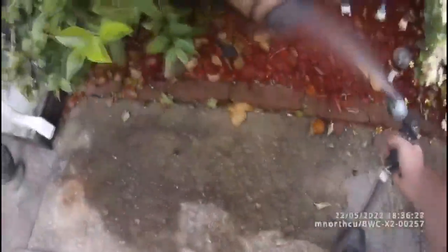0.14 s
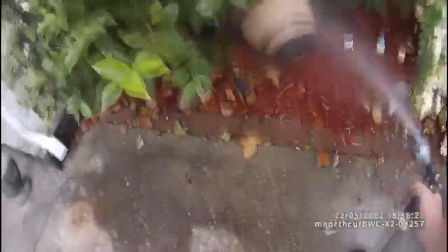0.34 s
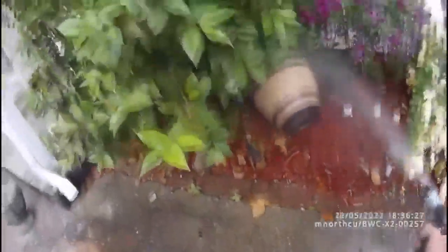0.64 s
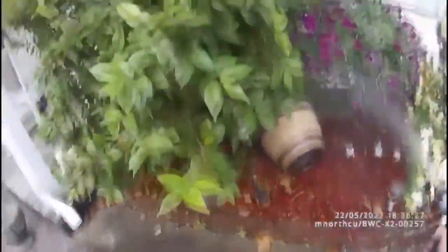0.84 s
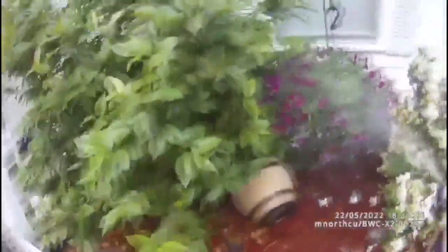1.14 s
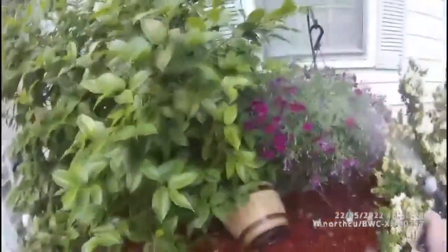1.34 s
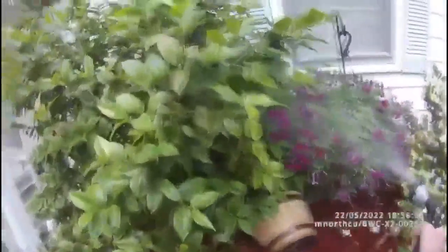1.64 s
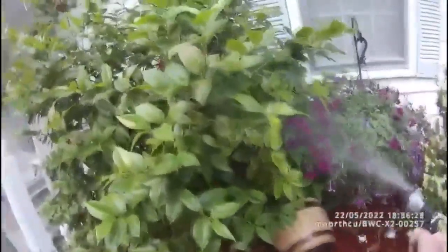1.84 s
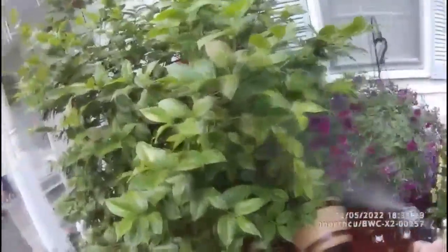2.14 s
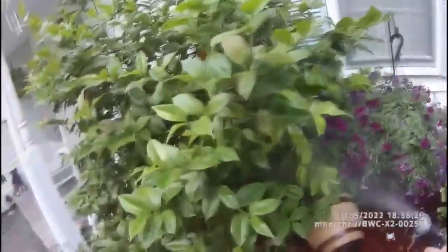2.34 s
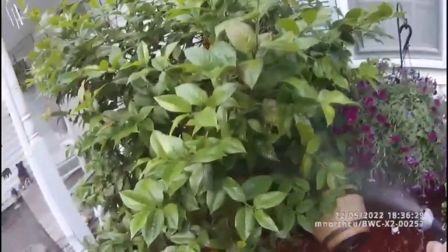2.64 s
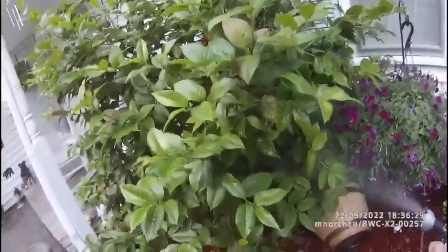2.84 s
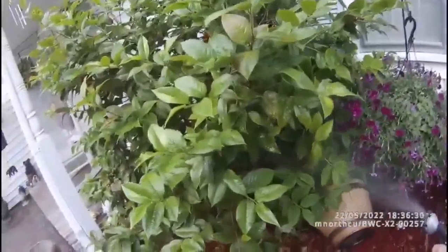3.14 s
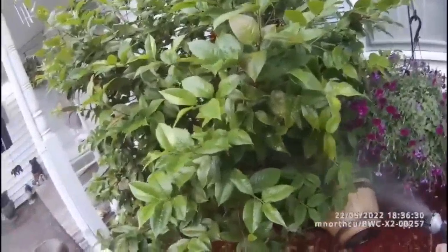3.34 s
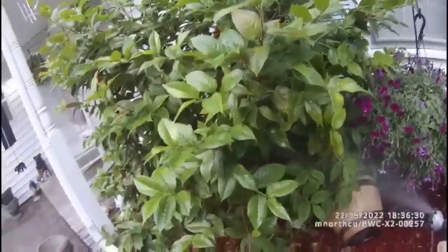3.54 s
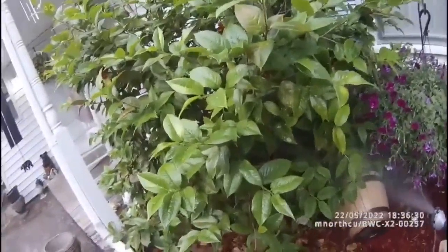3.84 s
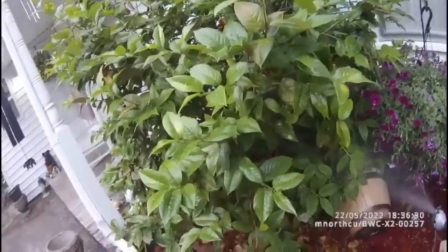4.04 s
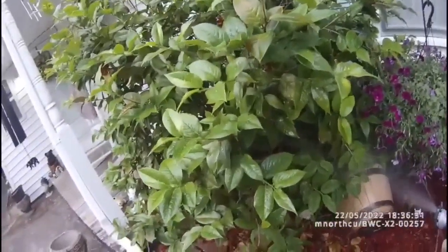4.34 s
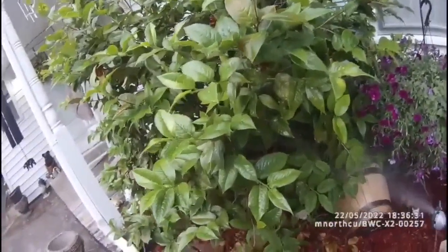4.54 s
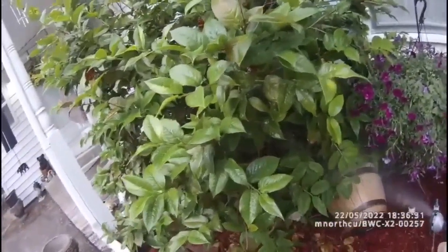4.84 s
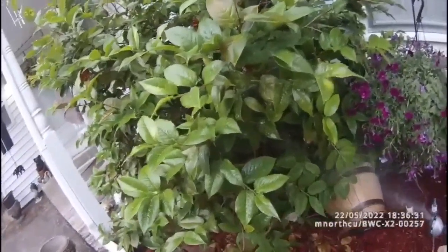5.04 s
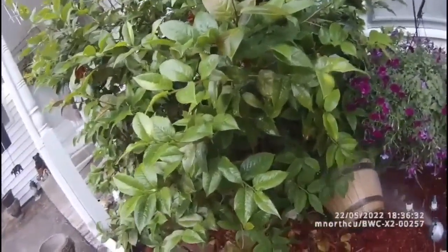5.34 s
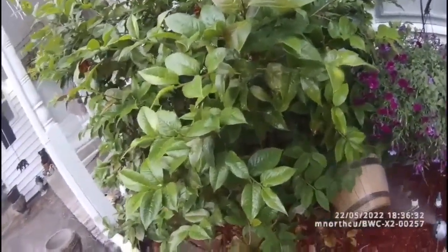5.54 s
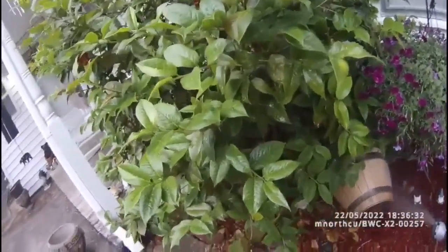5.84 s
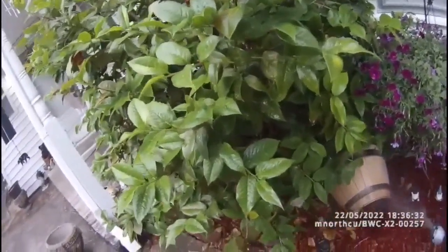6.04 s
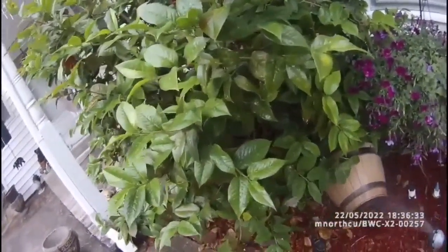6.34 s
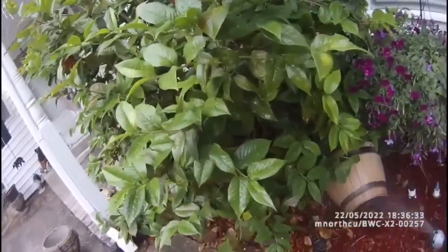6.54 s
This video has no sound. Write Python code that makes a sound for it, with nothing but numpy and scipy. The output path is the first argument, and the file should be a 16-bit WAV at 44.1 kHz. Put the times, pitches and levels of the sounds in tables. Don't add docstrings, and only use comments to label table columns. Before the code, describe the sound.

A garden hose nozzle sprays a steady hissing jet over leafy shrubs and mulch, with snapping droplets, brief wooden pot knocks and low wind rumble.

```python
import sys
import numpy as np
from scipy import signal
from scipy.io import wavfile
from scipy.ndimage import uniform_filter1d

SR = 44100
rng = np.random.default_rng(int(sys.argv[2]) if len(sys.argv) > 2 else 0)


def elevation(decibels):
    levels = np.asarray(decibels, float)
    return 10 ** (levels / 20)


def master(y):
    cut = np.clip(np.atleast_2d(y).T, -1, 1)
    pcm = np.round(cut * 32767)
    wavfile.write(sys.argv[1], SR, pcm.astype(np.int16))


N = 294588

# [t/s, peak level/dB, pitch f/Hz, half width/s]
FAR_ENGINE = [(0.05, -37, 27.5, .08), (0.42, -34.5, 29.16, 0.051), (0.65, -34, 25.1, 0.045),
              (1.1, -38, 35.9, 0.42), (1.9, -42, 31.74, .4), (2.6, -40, 36.1, 0.34),
              (3.31, -41, 30.5, 0.13), (3.74, -43, 31.4, 0.12), (4.55, -42.5, 36.96, 0.2),
              (5.4, -43, 30.47, 0.14), (5.9, -45.5, 31.1, 0.19), (6.35, -35.5, 30.1, 0.073)]
# [f/Hz, width/Hz, level/dB]
MOTOR_LINES = [
    (118.4, 27.5, 0.5),
    (243.4, 5.8, -19),
]
# [t/s, peak level/dB, half width/s]
BODY_SWAYS = [
    (0.12, -24.5, 0.057),
    (0.66, -33, .08),
    (1.9, -34.5, 0.39),
    (2.67, -42, 0.18),
    (3.8, -40, .2),
    (4.07, -46, 0.051),
    (5.2, -36, 0.098),
    (6.13, -42, 0.069),
]
# [t/s, peak level/dB, pitch f/Hz, half width/s]
GUSTS = [(0.12, -42, 49.5, .03), (0.72, -37, 47.9, 0.097), (1.11, -44, 46.5, 0.025), (1.26, -27, 52, 0.045),
         (1.42, -23, 49.8, 0.028), (1.54, -30, 46.4, 0.059), (1.68, -36, 47.2, .04),
         (1.95, -27.5, 52.63, 0.033), (2.65, -32, 54, 0.03), (2.77, -44, 54.8, 0.025),
         (2.91, -37, 55.5, .03), (3.21, -41.5, 59, 0.21), (3.96, -46, 61, 0.048), (4.62, -44, 51.3, 0.075),
         (4.92, -35, 55, 0.042), (5.23, -38, 52.4, 0.046), (5.5, -41.5, 53.2, 0.11),
         (5.8, -39.5, 53.9, 0.13), (6.14, -44, 53, 0.029), (6.3, -31.5, 54.7, 0.033),
         (6.48, -34, 53.7, .06), (6.6, -44, 54.6, 0.051)]
# [f/Hz, level/dB per Hz]
RUMBLE_COLOUR = [(8, -38), (20, 10), (40, 10.5), (60, 7), (75, 8), (110, -0.5), (150, -35)]
# [t/s, peak level/dB, ring f/Hz, time to fall 60 dB/s]
POT_THUMPS = [
    (1.727, -24, 490, 0.037),
    (1.729, -22, 126, 0.097),
    (1.875, -21, 800, 0.052),
    (1.892, -25.5, 380, 0.11),
    (1.906, -21, 780, 0.034),
]
# [t/s, peak level/dB, ring f/Hz, snap level/dB]
BIG_DROPS = [(0.0188, -17, 4040, -10), (0.3346, -26, 3680.0, -8.0), (0.7459, -7, 4120.0, -24),
             (0.7997, -10, 4530, -11.0), (0.9165, -15, 4000, -24.0), (0.9531, -5, 4430, -6),
             (1.0732, 0, 4340, -10), (1.111, -5, 4440, -17.0), (1.184, -7.5, 5260, -3),
             (1.4815, -4, 4570, -3), (1.6997, -5, 3707, -24.0), (2.0677, -2, 3800, -25.0),
             (2.2098, -2, 3980, -23.0), (2.295, -8, 4340, -1), (2.3069, -6, 4920, -14),
             (2.4956, -13, 4580, 4), (3.136, -8, 4900, -22), (3.5535, -4, 4850, -15),
             (3.6859, -5, 4830, -19.0), (4.1719, -7, 4990, -11), (4.389, -11, 4380.0, -18.0),
             (4.6611, -8, 4930, -30), (5.4417, -9, 3487, -24), (6.1756, -2.5, 4350, -12),
             (6.3301, -10, 3810, -28.0), (6.484, -8, 4820, -11), (6.5611, -7, 3730, -23),
             (6.6228, -14, 3550, -14)]
# [t/s, leaf spray level/dB, ground wash level/dB, wash tilt towards its top/dB]
JET_AIM = [(0.005, -50, -49, -5), (0.06, -43.5, -47, 8.5), (0.102, -39, -41, 7), (0.114, -31, -33.5, 4),
           (0.28, -29, -31, -3), (0.38, -29.5, -39.5, 6.5), (0.5, -25.5, -38, 2.5), (0.75, -25.5, -37, 0),
           (1.0, -27, -38.5, -2), (1.35, -32.5, -38.5, -5.5), (1.55, -28.5, -40, -2), (1.68, -26, -42, 5),
           (1.8, -26.5, -38.5, -2), (2.0, -26.5, -39, -0.5), (2.3, -24.5, -41, 1), (3.8, -26.5, -43, 2.5),
           (5.5, -28, -43.5, 3), (6.66, -32.5, -43, 2)]
# [t/s, swell level/dB, half width/s]
BRANCH_SWEEPS = [(0.55, -1, .03), (0.87, 4.5, 0.045), (1.075, 2, 0.021), (1.27, 3, 0.022), (1.46, 2, 0.033),
                 (1.68, 1, 0.057), (1.872, 6.5, 0.019), (1.92, 4.5, .02), (2.07, 6, 0.044),
                 (2.2, 1.5, 0.065), (2.7, 0.5, .08), (3.1, 1, 0.14), (4.098, 0.8, 0.078), (4.701, 1, 0.097),
                 (6.45, 0.5, 0.17)]
# [f/Hz, level/dB per Hz]
LEAF_COLOUR = [(760, -31.5), (1300, -21.5), (1630, -20.5), (1820, -11), (2190, -6.5), (3500, -3.5),
               (4460, -0.5), (7820, -21), (14900, -47.5)]
# [f/Hz, level/dB per Hz]
GROUND_COLOUR = [(82, -41), (140, -4.5), (240, -5), (600, -6.5), (900, -5.5), (1280, -6.5), (1520, -8),
                 (1750, -8), (2300, -18), (4200, -109.5)]
CHANNEL_OFFSET = [
    [.235],
    [.0156],
]


def evened(x):
    return x / np.sqrt(np.mean(x ** 2) + 1e-20)


def curves(rows):
    s, *columns = np.transpose(rows)
    return [np.interp(np.arange(N) / SR, s, c) for c in columns]


def colour(x, points):
    hz, db = np.transpose(points)
    grid = abs(np.fft.fftfreq(8192, 1 / SR))
    grid_db = np.interp(np.log(grid + 1), np.log(hz), db)
    log_gain = np.log(elevation(np.maximum(grid_db, -100)))
    taps = np.fft.ifft(np.exp(np.conj(signal.hilbert(log_gain)))).real[:4096]
    return signal.oaconvolve(x, taps)[:N]


def resonate(x, hz, width):
    turn = np.exp(2j * np.pi * np.cumsum(hz * np.ones(len(x))) / SR)
    r = np.exp(-np.pi * width / SR)
    return 2 * (turn * signal.lfilter([1 - r], [1, -r], x / turn)).real


def flicker(seconds):
    span = max(int(seconds * SR), 2)
    smooth = uniform_filter1d(rng.standard_normal(N), span)
    return evened(uniform_filter1d(smooth, span))


def tilted(x, hz, db):
    high = signal.butter(2, hz, "high", fs=SR, output="sos")
    top = signal.sosfiltfilt(high, x)
    return x + top * (elevation(db) - 1)


def swells(s, half_width):
    return np.exp(-((np.arange(N) / SR - np.c_[s]) / np.c_[half_width]) ** 2 / 2)


def surging(rows, rest_db):
    s, peak_db, hz, half_width = np.transpose(rows)
    level = elevation(rest_db) + elevation(peak_db) @ swells(s, half_width)
    return np.interp(np.arange(N) / SR, s, hz), 20 * np.log10(level)


def tone(hz, db):
    level = np.sqrt(2) * elevation(db + 2.2 * flicker(0.06))
    wavering_hz = hz + 1.6 * flicker(0.05)
    return level * np.sin(2 * np.pi * np.cumsum(wavering_hz) / SR)


def engine():
    return tone(*surging(FAR_ENGINE, rest_db=-54.5))


def motor():
    start_db, growth_db_per_s = -52.5, 1.0
    lines = np.zeros(N)
    for hz, width, db in MOTOR_LINES:
        narrow = resonate(rng.standard_normal(N), hz, width)
        lines += elevation(db) * evened(resonate(narrow, hz, width))
    return elevation(start_db + growth_db_per_s * np.arange(N) / SR) * lines


def sway():
    s, peak_db, half_width = np.transpose(BODY_SWAYS)
    level = elevation(-52) + elevation(peak_db) @ swells(s, half_width)
    return elevation(-5.0) * level * evened(resonate(rng.standard_normal(N), 23, 12))


def wind():
    rumble_db = -43.5 + 1.9 * flicker(0.082)
    rumble = evened(colour(rng.standard_normal(N), RUMBLE_COLOUR)) * elevation(rumble_db)
    return tone(*surging(GUSTS, rest_db=-52.5)) + rumble


def pot():
    out, t = np.zeros(N), np.arange(6000) / SR
    for s, peak_db, hz, t60 in POT_THUMPS:
        splash = resonate(rng.standard_normal(len(t)), 1.2 * hz, 900)
        splash = evened(resonate(splash, 1.2 * hz, 1600))
        ring = 0.6 * np.sin(2 * np.pi * hz * t) + 0.85 * splash
        soft_start = 1 - np.exp(-t / 0.0031)
        out[round(s * SR):][:6000] += elevation(peak_db - 60 * t / t60) * ring * soft_start
    return out


def drops():
    out, t = np.zeros(N + 200), np.arange(-100, 100) / SR
    for s, peak_db, hz, top_db in BIG_DROPS:
        ring = np.cos(2 * np.pi * hz * t) * np.exp(-abs(t / 0.0003) ** 1.8)
        snap = elevation(top_db - 5) * np.cos(2 * np.pi * 7400 * t) * np.exp(-abs(t / 0.0002) ** 1.6)
        out[round(s * SR) - 100:][:200] += elevation(peak_db - 6) * (ring + snap)
    out = out[:N]
    first_echo = -elevation(-9.5) * np.roll(out, round(0.002 * SR))
    second_echo = elevation(-13.0) * np.roll(out, round(0.0043 * SR))
    return out + first_echo + second_echo


def droplets(per_s, spread_db):
    size = elevation(spread_db * np.minimum(rng.exponential(1, N), 3.8))
    strikes = rng.random(N) < per_s / SR
    return evened(size * rng.choice([-1., 1.], N) * strikes)


def leaf_spray(gusts_db, sweep_db):
    drive = rng.standard_normal(N) + 0.42 * droplets(per_s=1800, spread_db=3.2)
    leaves = evened(colour(elevation(gusts_db) * drive, LEAF_COLOUR))
    soaking_db_per_s, swell_dulling = 0.83, 0.27
    bright_db = -soaking_db_per_s * np.arange(N) / SR - swell_dulling * sweep_db
    bright_db = bright_db - bright_db.mean() + 0.2 * flicker(0.011)
    leaves = tilted(leaves, 3600, 0.52 * flicker(0.089))
    leaves = tilted(leaves, 4500, bright_db)
    return tilted(leaves, 10000, 0.61 * bright_db + flicker(0.033))


def ground_wash(gusts_db, tilt_db):
    drive = rng.standard_normal(N) + 0.33 * droplets(per_s=400, spread_db=5.0)
    soak = elevation(0.19 * gusts_db + 0.82 * flicker(0.049)) * drive
    return tilted(evened(colour(soak, GROUND_COLOUR)), 780, tilt_db)


def spray():
    leaves_db, ground_db, tilt_db = curves(JET_AIM)
    s, swell_db, half_width = np.transpose(BRANCH_SWEEPS)
    sweep_db = swell_db @ swells(s, half_width)
    gusts_db = 0.48 * flicker(0.019) + 0.6 * flicker(0.0059)
    leaves = elevation(leaves_db + sweep_db + 0.8) * leaf_spray(gusts_db, sweep_db)
    return leaves + elevation(ground_db) * ground_wash(gusts_db, tilt_db)


def scene():
    heard = engine() + motor() + sway() + wind() + pot() + drops() + spray()
    return np.ones((2, 1)) * heard


def flipped(x):
    hz, t, z = signal.stft(x, SR, nperseg=2048)
    band = (hz // 600).astype(int)
    rise_db = 45 * np.log2((band + 1) / 21)[:, None] + 4.5 * (t - 3)
    share = np.clip(0.035 * elevation(rise_db), 0.004, 0.35) * (hz > 6000)[:, None]
    turned = rng.random((len(t), band[-1] + 1))[:, band].T < share
    return signal.istft(np.where(turned, -z, z), SR, nperseg=2048)[1][:N]


def band_limit(x):
    return signal.sosfilt(signal.butter(12, 15020, fs=SR, output="sos"), x)


def record(dry):
    left, right = dry
    mix = np.array([left, flipped(right)]) + np.array(CHANNEL_OFFSET)
    return band_limit(mix)


dry = scene()
out = record(dry)
master(out)
```